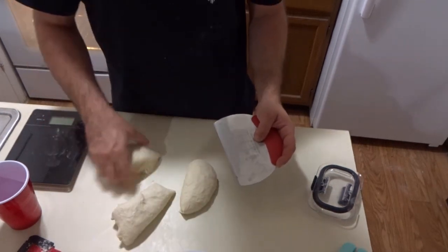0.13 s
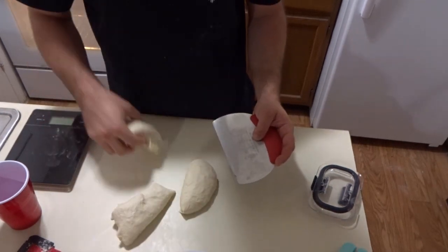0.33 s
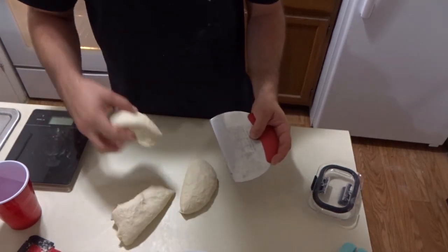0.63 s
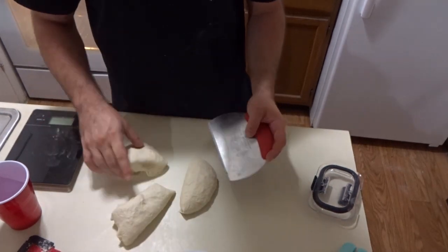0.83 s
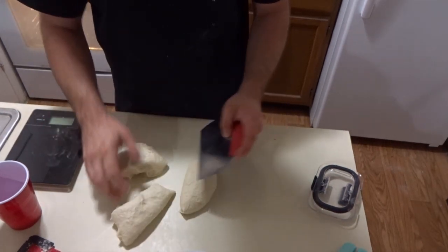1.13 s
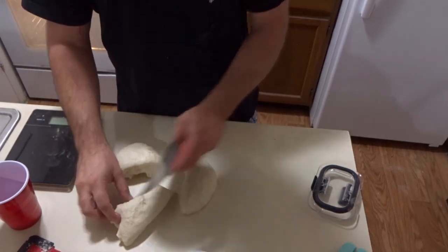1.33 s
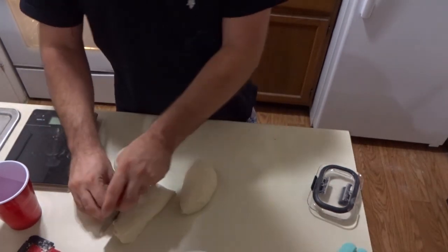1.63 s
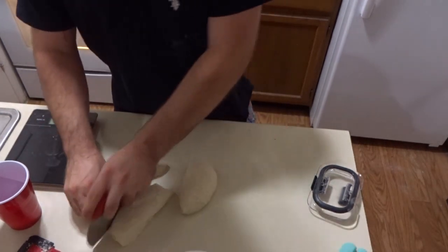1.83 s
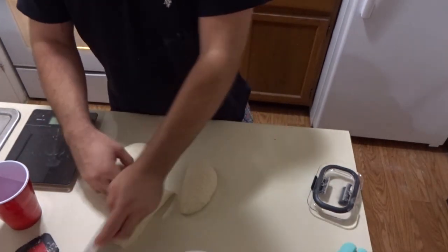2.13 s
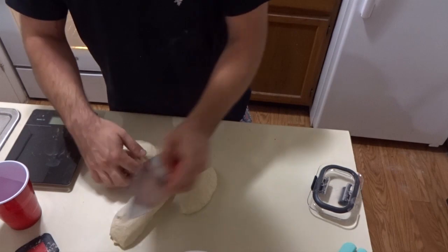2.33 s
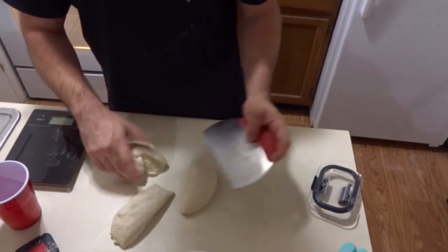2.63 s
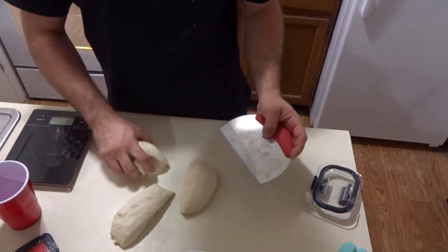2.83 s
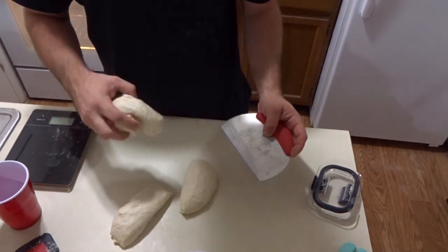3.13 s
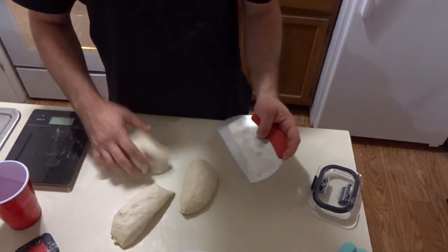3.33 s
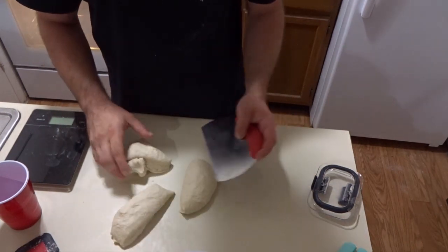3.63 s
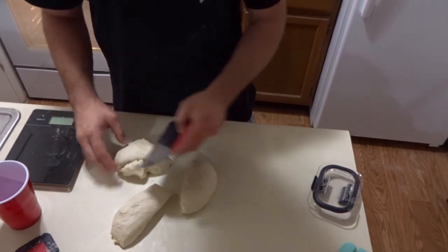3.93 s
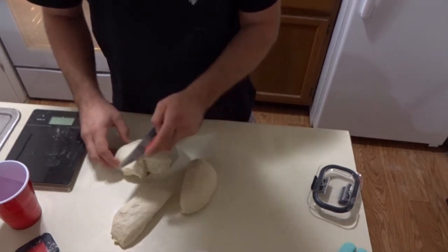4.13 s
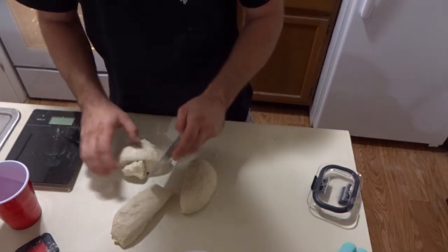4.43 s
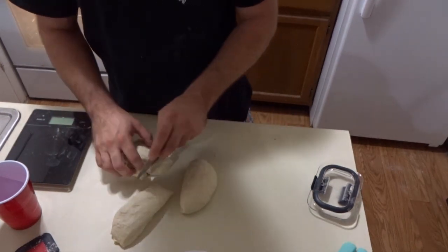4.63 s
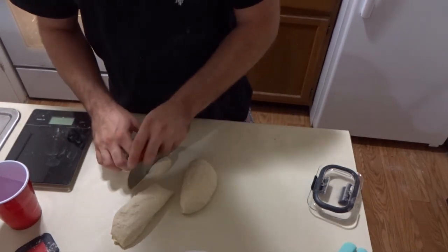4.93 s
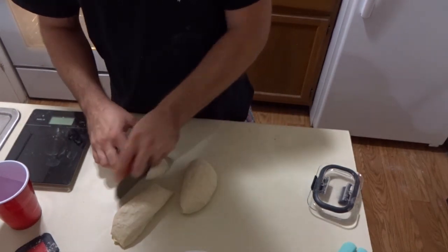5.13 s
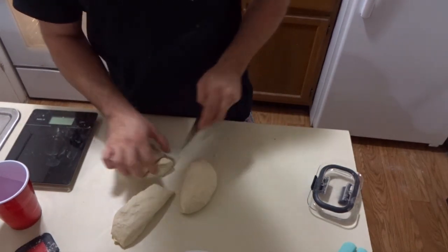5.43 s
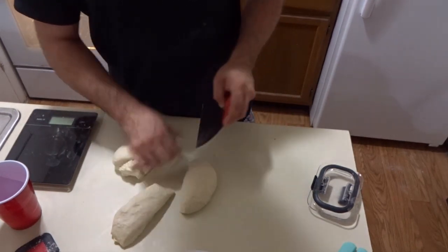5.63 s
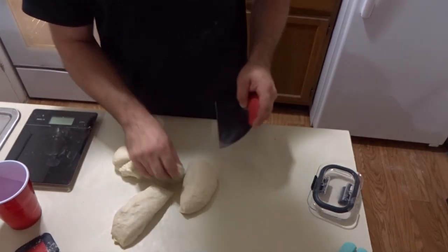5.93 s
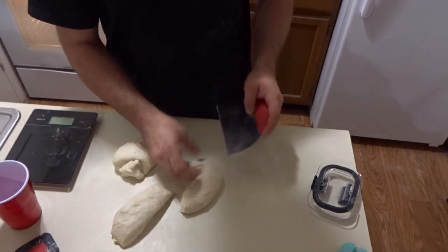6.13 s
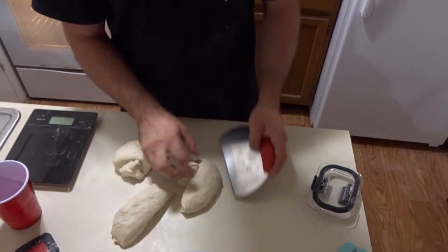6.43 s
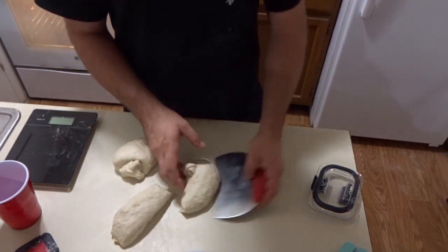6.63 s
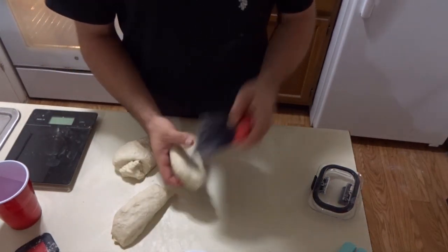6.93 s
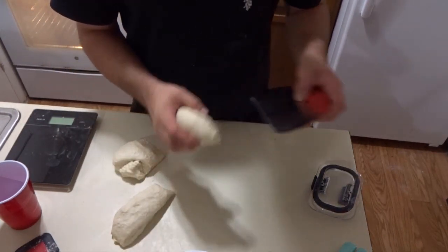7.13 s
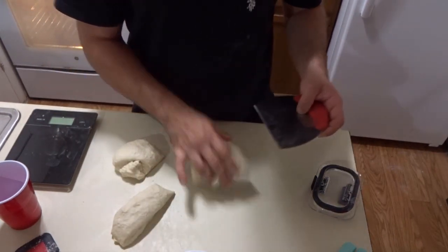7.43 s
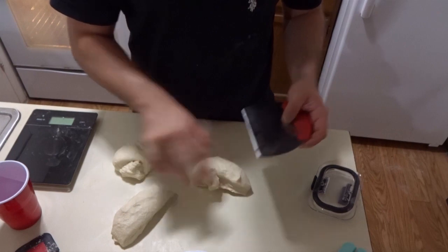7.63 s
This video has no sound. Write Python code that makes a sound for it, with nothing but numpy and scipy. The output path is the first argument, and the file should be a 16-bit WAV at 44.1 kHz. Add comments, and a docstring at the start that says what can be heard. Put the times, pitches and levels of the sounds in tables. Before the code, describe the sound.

Sparse dough work on a counter: dull thud-then-hard scraper cuts, short gritty metal scrapes, a rattle of taps and a heavy final dough slap.

```python
"""Lumps of dough slap down on a kitchen counter; a steel scraper chops, taps and scrapes.
Hands, dough and the moving scraper bump the counter softly, and there is some rubbing.
Each blow is a light touch and a noisy chatter that ring a filter shaped like the thing struck.
Scrapes and rubs are grainy noise whose loudness follows the pressure; a small kitchen answers them all.
Behind them lies a faint hiss that swells and sinks, with a thin high tone; two microphones hear it."""
import sys
import numpy as np
from scipy import signal
from scipy.fft import rfft, irfft
from scipy.io import wavfile
from scipy.ndimage import uniform_filter1d, minimum_filter1d

SR = 44100
rng = np.random.default_rng(int(sys.argv[2]) if len(sys.argv) > 2 else 0)


def store_pcm(level_fs):
    """Save levels as 16-bit WAV."""
    pcm = np.round(np.clip(level_fs, -1, 1) * 32767).astype(np.int16)
    wavfile.write(sys.argv[1], SR, np.atleast_2d(pcm).T)


N = 342657  # samples in the scene
RING_SAMPLES = 8192  # length of every struck or rubbed filter
RING_T = np.arange(RING_SAMPLES) / SR
HZ = np.fft.rfftfreq(2 * RING_SAMPLES, 1 / SR)
BLOW_S = 0.05  # a blow's level means its energy spread over this time

# cuts through the dough: t/s, dull knock level/dB, its pitch f/Hz, time until the edge is through/s,
# hard knock level/dB, time from there to the bounce/s
CUTS = [(1.8484, -13, 568, 0.0905, -8.5, 0.044), (4.9082, -18, 452, 0.1112, -9.5, 0.026)]
# resonances of the counter: f/Hz, width/Hz, lift/dB at full strength (see lift for negative ones)
COUNTER_MODES = [(220.4, 19, 5.5), (282, 4.1, 11.5), (330.3, 6.9, 8.5), (451, 78, 4), (499, 57, 3.5),
                 (631.7, 26, 6.5), (721, 10, -5), (776, 23, 9.5), (848, 16, 7), (1060, 38, 7.5),
                 (1260, 23, 3.5), (1250, 14, -5), (1340, 9, 6), (1730, 45, 5), (2490, 20, 9),
                 (2710, 120, 6.5)]
# resonances of the steel blade: f/Hz, width/Hz, lift/dB at full strength
BLADE_MODES = [(576, 52, 6.5), (816, 30, 10.5), (1079, 24, 20.5), (1152, 59, 14), (1837, 60, 12),
               (2080, 51, 12.5), (2594, 116, 13.5), (3050, 110, 9), (4200, 560, 12), (6900, 830, 8.5),
               (10600, 640, 8.5)]
# relative spectrum of a soft bump: f/Hz, level/dB per Hz
BUMP_SPECTRUM = [(30, -29), (65, -22.5), (110, -14.5), (190, -2), (400, 3), (1500, 2), (4000, -63),
                 (16000, -51)]
# relative spectrum of the blade's flat grinding on the counter: f/Hz, level/dB per Hz
GRIND_SPECTRUM = [(40, -47), (130, -23), (220, -15.5), (450, 5), (800, -3.5), (1400, -1), (2300, -7),
                  (3300, -11.5), (4600, -15.5), (6000, -20.5), (16000, -39)]
# relative spectrum of the blade's edge hissing on the counter: f/Hz, level/dB per Hz
EDGE_SPECTRUM = [(200, -35), (1500, 3.5), (3500, -2), (5600, -1.5), (8000, 0), (11000, 3.5), (13500, 1.5),
                 (16000, -7)]


def slaps():
    """Air cracks out from under the dough while its weight thuds into the counter."""
    # dough landing: t/s, thud level/dB, thud low corner f/Hz, trapped air f/Hz,
    # crack level/dB, crack f/Hz, crack length/s
    slap_table = [(0.808, -21, 370, 354, -21.5, 10200, 0.01), (3.4048, -25.5, 150, 856, -25, 1860, 0.0071),
                  (7.5340, -11, 90, 174, -16.5, 8150, 0.0028)]
    # relative spectrum of the thud: f/Hz, level/dB per Hz
    thud_spectrum = [(30, -50), (65, -37), (120, -33), (200, -5.5), (300, 9), (900, 6.5), (1400, 1.5),
                     (2200, -6.5), (3000, -19), (6000, -32), (16000, -56)]
    # relative spectrum of the crack: f/Hz, level/dB per Hz
    crack_spectrum = [(200, -35), (1000, -11.5), (1800, 5), (2400, 2), (3000, -1.5), (4200, 2.5),
                      (5700, -5), (8000, -2), (10500, -5), (13000, -6), (16000, -18)]
    air_sharpness, air_lift_db = 7.4, 9  # the air pocket under a lump
    give_db, give_per_thud_db = -28.5, 0.25  # worktop under a 0 dB thud; dB gained for each dB of thud

    out = np.zeros((2, N))
    for s, thud_db, low_hz, air_hz, crack_db, crack_hz, crack_s in slap_table:
        # the crack has a second peak at three times its pitch
        crack_peaks = [(hz, 1200, 6) for hz in (crack_hz, 3 * crack_hz)]
        crack = read(crack_spectrum, HZ) + lift(crack_peaks)
        air = lift([(air_hz, air_hz / air_sharpness, air_lift_db)])
        thud = read(thud_spectrum, HZ) + lift(COUNTER_MODES) + air + 2 * thin(low_hz)
        add(out, s, crack_db, blow(crack, contact_s=crack_s, chatter_db=38, room_db=-3.5))
        add(out, s, thud_db, blow(thud, contact_s=0.012, chatter_db=4.5, room_db=4.5))
        add(out, s, give_db + give_per_thud_db * thud_db, give())
    return out


def knocks():
    """The edge lands dully through dough, shudders, then hits the bare counter hard and bounces once."""
    flex_db, flex_hz = -18.5, 1060  # the blade shudders while it is forced through
    hard_hz, bounce_hz = 1120, 780
    bounce_db, give_db = -12, -34  # both against the hard knock
    cushioned = soften(corner_hz=880, least_db=-30.5) + thin(corner_hz=234)
    flexing = soften(corner_hz=1080, least_db=-40) + thin(corner_hz=520)
    bare = soften(corner_hz=2830) + thin(corner_hz=153)
    light = soften(corner_hz=1500) + thin(corner_hz=130)

    out = np.zeros((2, N))
    for s, dull_db, dull_hz, through_s, hard_db, bounce_s in CUTS:
        dull = knock(cushioned, dull_hz, chatter_s=0.009, chatter_db=11, room_db=-2.5,
                     damping_db_per_s=88, width_hz=97, pitch_db=13)
        shudder = knock(flexing, flex_hz, chatter_s=0.021, chatter_db=25, room_db=2, damping_db_per_s=49)
        hard = knock(bare, hard_hz, chatter_s=0.0095, chatter_db=12, room_db=-1.5, damping_db_per_s=2)
        bounce = knock(light, bounce_hz, chatter_s=0.0067, chatter_db=-2.5, room_db=-6,
                       damping_db_per_s=37)
        add(out, s, dull_db, dull)
        add(out, s, flex_db, shudder)
        add(out, s + through_s, hard_db, hard)
        add(out, s + through_s, hard_db + give_db, give())
        add(out, s + through_s + bounce_s, hard_db + bounce_db, bounce)
    return out


def knock(contact_db, pitch_hz, chatter_s, chatter_db, room_db, damping_db_per_s, width_hz=170, pitch_db=6):
    """One blow of the edge rings the counter; the hand and the dough damp it."""
    # relative spectrum of the edge knocking: f/Hz, level/dB per Hz
    knock_spectrum = [(30, -61), (100, -35), (200, -14), (500, -5), (1100, -2), (2000, -1.5), (3000, -10),
                      (4500, -8), (5500, -17), (10000, -16), (16000, -21)]
    modes = COUNTER_MODES + [(pitch_hz, width_hz, pitch_db)]
    body = read(knock_spectrum, HZ) + lift(modes) + contact_db
    sound = blow(body, chatter_s, chatter_db, room_db)
    return sound * amp(-damping_db_per_s * np.arange(sound.shape[1]) / SR)


def scrapes():
    """Tiny slips of the edge ring the blade; the pressure on it judders."""
    # strokes along the counter: start t/s, length/s, grinding level/dB, edge hiss level/dB,
    # pressure change over the stroke/dB, low corner f/Hz, rasp f/Hz
    stroke_table = [(1.976, 0.1163, -22.5, -34, 5, 586, 2660), (2.129, 0.023, -35, -37, 6, 500, 4300),
                    (5.03, 0.097, -27.5, -34.5, 1.5, 240, 1230), (5.173, 0.14, -29, -34.5, -1.5, 240, 910),
                    (6.578, 0.084, -29.5, -34, -2, 450, 1100), (6.659, 0.13, -26, -23.5, -7.5, 450, 2150),
                    (6.88, 0.078, -42, -39, -4, 400, 2200)]
    judder_db, slip_db = 2, -6  # slips are set against the grinding grit
    rasp_width_hz, rasp_db = 540, 3  # the angle of the blade lifts one band in each stroke

    t = np.arange(N) / SR
    out = np.zeros(N)
    wobble = evened(uniform_filter1d(rng.standard_normal(N), size=220))
    judder = amp(judder_db * wobble)
    coarse = judder * evened(grit(grain_db=2) + amp(slip_db) * slips())
    fine = judder * grit(grain_db=3)
    edge = ring(read(EDGE_SPECTRUM, HZ) + 0.7 * lift(BLADE_MODES))
    for s, length, grind_db, edge_db, swell_db, low_hz, rasp_hz in stroke_table:
        push = pressure(t - s, length, swell_db)
        rasp = lift([(rasp_hz, rasp_width_hz, rasp_db)])
        plate = ring(read(GRIND_SPECTRUM, HZ) + 0.5 * lift(BLADE_MODES) + rasp + thin(low_hz))
        out += signal.oaconvolve(push * amp(grind_db) * coarse, plate)[:N]
        out += signal.oaconvolve(push * amp(edge_db) * fine, edge)[:N]
    return in_kitchen(out, room_db=-1)


def pressure(t, length, swell_db):
    """The edge bites, is pushed steadily harder or softer, and lifts off."""
    bite_s, lift_off_s = 0.021, 0.013
    bite = np.clip(t / bite_s, 0, 1)
    leave = np.clip(1 - (t - length) / lift_off_s, 0, 1)
    return bite * leave * amp(swell_db * (np.clip(t / length, 0, 1) - 0.5))


def slips():
    """The edge catches and lets go at uneven moments, in jolts of uneven size."""
    rate_per_s, spread_db = 140, 3.5
    moments = rng.random(N) < rate_per_s / SR
    direction = rng.choice([-1, 1], N)
    size = amp(spread_db * rng.uniform(-1, 1, N))
    return evened(moments * direction * size)


def grit(grain_db):
    """Noise of tiny slips, uneven in size."""
    size_db = grain_db * np.minimum(rng.exponential(1, N), 5)
    return evened(rng.standard_normal(N) * amp(size_db))


def taps():
    """The blade, laid flat to scoop, ticks against the counter, nudges it and rings briefly."""
    # taps of the flat blade: t/s, ring level/dB, tick level/dB, tick high corner f/Hz
    tap_table = [(6.5408, -25.5, -38, 4560), (6.5743, -22.5, -34, 6000), (6.59, -23, -32, 5000),
                 (6.602, -21.5, -31.5, 8500), (6.612, -19.5, -44, 4000), (6.951, -35, -32, 15000),
                 (7, -59, -43.5, 8000)]
    nudge_db = -16.5  # against the ring
    out = np.zeros((2, N))
    steel = lift(BLADE_MODES)
    flat = read(GRIND_SPECTRUM, HZ) + steel + soften(corner_hz=1500) + thin(corner_hz=300)
    for s, db, tick_db, tick_hz in tap_table:
        tick = read(EDGE_SPECTRUM, HZ) + steel + soften(tick_hz)
        add(out, s, db, blow(flat, contact_s=0.0083, chatter_db=10, room_db=-1))
        add(out, s, tick_db, blow(tick, contact_s=0.0048, chatter_db=10, room_db=-5))
        add(out, s, db + nudge_db, bump(high_hz=266))
    return out


def bumps():
    """Hand, dough and moving scraper bump the counter softly."""
    # soft bumps: t/s, level/dB, high corner f/Hz
    bump_table = [(0.147, -43.5, 600), (0.182, -35, 226), (2.527, -45, 250), (2.745, -52, 350),
                  (2.831, -49.5, 280), (2.866, -52, 400), (5.195, -45, 500), (5.291, -44, 400),
                  (6.954, -36, 624)]
    out = np.zeros((2, N))
    for s, db, high_hz in bump_table:
        add(out, s, db, bump(high_hz))
    return out


def bump(high_hz):
    """A soft push on the counter stirs mostly its low resonances."""
    body = read(BUMP_SPECTRUM, HZ) + 0.5 * lift(COUNTER_MODES) + soften(high_hz)
    return blow(body, contact_s=0.013, chatter_db=-1.5, room_db=0)


def give():
    """The whole worktop gives a little under a heavy blow, with a low resonance."""
    weight = read(BUMP_SPECTRUM, HZ) + soften(corner_hz=190) + lift([(68, 21, 6.9)])
    return blow(weight, contact_s=0.014, chatter_db=-9, room_db=2)


def rubs():
    """Short swells of fine friction from dough and skin, and from the blade pressing into the dough."""
    # dough and fingers brushing the counter: middle t/s, length/s, level/dB, brightness/dB an octave
    rub_table = [(0.152, 0.034, -30, -2.5), (0.208, 0.026, -36.5, 0), (0.297, 0.13, -43.5, 5.5),
                 (0.75, 0.046, -49.5, 4), (2.279, 0.12, -46.5, 0), (2.427, 0.024, -53, 2),
                 (2.58, 0.063, -48, 0.5), (2.878, 0.085, -45.5, -1), (2.998, 0.053, -42.5, 0.5),
                 (3.026, 0.026, -37, 5), (4.01, 0.029, -48.5, 0.5), (4.366, 0.067, -49.5, 2),
                 (5.671, 0.026, -44, 7), (6.18, .08, -53.5, 7), (6.25, .007, -47, 10),
                 (6.408, .05, -50.5, 5), (7.533, 0.02, -25, -3.5)]
    # relative spectrum of the friction: f/Hz, level/dB per Hz
    rub_spectrum = [(60, -18.5), (300, 7), (900, 8.5), (2000, 5), (3000, -1.5), (4300, 7.5), (5400, -2),
                    (6800, 2), (8500, -2.5), (11000, 3), (16000, -9)]
    # dough squeezed as each cut lands, in the same columns
    presses = [(cut[0], 0.03, -36, -4) for cut in CUTS]

    t = np.arange(N) / SR
    friction = grit(grain_db=5)
    out = np.zeros(N)
    for s, length, db, slope_db in rub_table + presses:
        near = abs(t - s) < 0.3
        swell = amp(db) * np.exp(-(2 * (t[near] - s) / length) ** 2)
        colour = ring(read(rub_spectrum, HZ) + slope_db * np.log2(HZ + 1) + thin(corner_hz=110))
        out[near] += signal.fftconvolve(swell * friction[near], colour)[:len(swell)]
    return in_kitchen(out, room_db=-2)


def blow(spectrum_db, contact_s, chatter_db, room_db):
    """A sharp touch and a brief chatter, coloured by what is struck, heard in the kitchen."""
    touch_s = 0.00099  # the touch comes this long after the chatter starts to rise
    force = amp(chatter_db) * burst(contact_s)
    force[round(touch_s * SR)] += 1
    return signal.fftconvolve(ring(spectrum_db)[None], balanced(kitchen(force, room_db)), axes=1)


def burst(seconds):
    """A puff of noise that rises fast and dies."""
    u = RING_T / max(seconds, 1 / SR)
    return unit(rng.standard_normal(RING_SAMPLES) * np.sqrt(u) * np.exp(-2 * u))


def ring(db):
    """Response of a struck object with the given spectrum, sounding as early as it can (minimum phase)."""
    log_gain = np.log(amp(np.maximum(db - db.max(), -100)))
    circle = np.concatenate([log_gain, log_gain[-2:0:-1]])
    response = np.fft.ifft(np.exp(np.conj(signal.hilbert(circle)))).real
    return unit(response[:RING_SAMPLES])


def lift(modes, hz=HZ):
    """Gain in dB of resonances above a flat response; a negative lift also adds a little."""
    peaks = sum(abs(amp(db) ** 2 - 1) / (1 + (2 * (hz - f) / width) ** 2) for f, width, db in modes)
    return 10 * np.log10(1 + peaks)


def soften(corner_hz, least_db=-27):
    """A soft contact loses 12 dB an octave above its corner, down to a faint tick."""
    return 10 * np.log10(1 / (1 + (HZ / corner_hz) ** 4) + amp(least_db) ** 2)


def thin(corner_hz):
    """A light contact loses 12 dB an octave below its corner."""
    return -10 * np.log10(1 + (corner_hz / (HZ + 1)) ** 4)


def kitchen(direct, room_db):
    """Direct sound, then dense reflections that die at their own speed in each band, slightly apart per side."""
    # reverberation: f/Hz, time to fall by 60 dB/s
    fall_times = [(70, 0.86), (130, 0.36), (260, 0.33), (700, 0.33), (1840, 0.35), (4850, 0.34),
                  (10000, 0.29), (15000, 0.28)]
    # how far the microphones differ on the reflections: f/Hz, side against mid level/dB
    spread = [(60, -14), (200, -38), (500, -20.5), (1200, -11), (3000, -12), (6000, -11.5), (14000, -31)]
    first_s, build_s = 0.0021, 0.00029  # first reflection, and how fast they build up
    size = SR // 2
    hz, t, z = signal.stft(rng.standard_normal((2, size)), SR, nperseg=512)
    z = z * amp(-60 * t / read(fall_times, hz)[:, None])
    z[1] *= amp(read(spread, hz))[:, None]
    onset = 1 - np.exp(-np.maximum(np.arange(size) / SR - first_s, 0) / build_s)
    mid, side = signal.istft(z, SR, nperseg=512)[1][:, :size] * onset
    response = amp(room_db) * unit(np.array([mid + side, mid - side]))
    response[:, :len(direct)] += unit(direct)
    return unit(response)


def balanced(response):
    """Levels out broad humps of a response, so that the struck object gives the colour."""
    power = (abs(rfft(response[:, :2 * RING_SAMPLES])) ** 2).mean(0)
    level = ring(-10 * np.log10(uniform_filter1d(power, size=21) + 1e-9))
    return unit(signal.fftconvolve(response, level[None], axes=1)[:, :response.shape[1]])


def in_kitchen(x, room_db):
    """A lasting sound heard in the kitchen."""
    return signal.fftconvolve(x[None], kitchen(np.ones(1), room_db), axes=1)[:, :N]


def add(mix, s, db, sound):
    """Mixes in a blow whose energy equals that level held for BLOW_S."""
    part = mix[:, round(s * SR):][:, :sound.shape[1]]
    part += (amp(db) * np.sqrt(BLOW_S * SR) * unit(sound))[:, :part.shape[1]]


def amp(db):
    """Decibels to gain."""
    return 10 ** (np.asarray(db) / 20)


def evened(x):
    """Scales to an rms of 1."""
    return x / np.sqrt(np.mean(x ** 2) + 1e-20)


def unit(x):
    """Scales to an average energy of 1 a channel."""
    return evened(x) / np.sqrt(x.shape[-1])


def read(points, hz):
    """Reads a table on a log-frequency axis."""
    f, value = np.transpose(points)
    return np.interp(np.log(hz + 1), np.log(f + 1), value)


def hiss():
    """Noise that swells and sinks, with a rushing middle band leaning to the left, and a thin steady whine."""
    # relative spectrum at the left microphone, before the peaks: f/Hz, level/dB per Hz
    hiss_spectrum = [(40, -40), (100, -28.5), (170, -19.5), (300, -14.5), (450, -6.5), (750, -8),
                     (1000, -2), (1200, 4.5), (1420, -4.5), (1700, 1), (1930, -6.5), (2150, -22),
                     (7000, -27), (15800, -34)]
    # how much stronger the hiss is on the left: f/Hz, level/dB
    hiss_lean = [(60, 9.5), (300, -3), (420, 4.5), (750, 3), (1170, 12.5), (1400, 6), (1700, 7.5),
                 (1950, 5), (2250, 0), (15000, 0)]
    # left-right likeness: f/Hz, correlation from -1 to 1
    likeness = [(60, 0.56), (130, 0.75), (290, 0.37), (640, -0.68), (1410, -0.21), (3100, 0.2),
                (6820, 0.64), (15000, 0.99)]
    # broad and narrow peaks in the hiss: f/Hz, width/Hz, lift/dB
    hiss_peaks = [(238, 3.1, 11.5), (2740, 670, 5.5), (4110, 1400, 4), (10700, 500, 2.5)]
    # slow swelling and sinking: t/s, level/dB
    hiss_level = [(0, -38), (.55, -37), (1.0, -40.3), (1.8, -39), (2.4, -43.5), (4.05, -41.5), (4.3, -39.5),
                  (4.85, -38.5), (5.5, -42.5), (6.3, -41.5), (7.77, -37)]
    whine_hz, whine_db = 15735, -70.5

    t = np.arange(N) / SR
    hz = np.fft.rfftfreq(N, 1 / SR)
    left, other = rfft(rng.standard_normal((2, N)))
    same = np.clip(read(likeness, hz), -1, 1)
    right = (same * left + np.sqrt(1 - same ** 2) * other) * amp(-read(hiss_lean, hz))
    colour = amp(read(hiss_spectrum, hz) + lift(hiss_peaks, hz))
    air = evened(irfft(np.array([left, right]) * colour, N))
    whine = amp(whine_db) * evened(np.sin(2 * np.pi * whine_hz * t))
    return air * amp(np.interp(t, *np.transpose(hiss_level))) + whine


def scene():
    """The work lies slightly off straight ahead, so the microphones differ a little in level and phase."""
    # how much stronger the work sounds on the left: f/Hz, level/dB
    work_lean = [(120, 1.5), (300, 0.8), (1100, 1.4), (2200, -0.5), (12000, -0.5)]
    # how far the left microphone leads: f/Hz, phase/rad
    phase_lead = [(0, 0.047), (1640, -0.25), (2840, 0.037), (16500, 0.0)]
    work = slaps() + knocks() + scrapes() + taps() + bumps() + rubs()
    hz = np.fft.rfftfreq(N, 1 / SR)
    # each side takes half of the difference
    left = amp(read(work_lean, hz) / 2) * np.exp(0.5j * read(phase_lead, hz))
    return irfft(rfft(work) * np.array([left, 1 / left]), N) + hiss()


def record(dry):
    """A fast limiter holds the hardest blows under full scale; then a low-pass removes the highest treble."""
    ceiling_db, recovery_db_per_s, cut_hz = -0.3, 600, 16000
    over_db = np.maximum(20 * np.log10(abs(dry).max(0) + 1e-9) - ceiling_db, 0)
    # the gain drops at once and recovers at a steady rate
    fall = np.arange(N) * recovery_db_per_s / SR
    held_db = np.maximum.accumulate(over_db + fall) - fall
    # look a little ahead and round off the steps
    gain_db = uniform_filter1d(minimum_filter1d(-held_db, size=133), size=133)
    limited = dry * amp(gain_db)
    low_pass = signal.firwin(401, cut_hz, window=("kaiser", 9), fs=SR)
    return signal.oaconvolve(limited, low_pass[None], "same", axes=1)


dry = scene()
out = record(dry)
store_pcm(out)
```